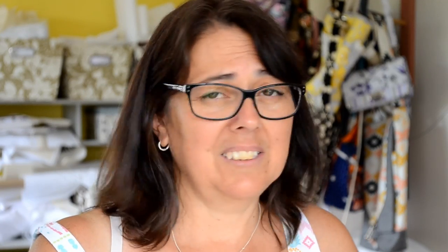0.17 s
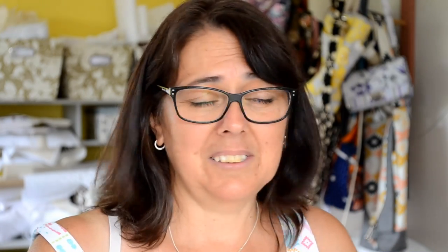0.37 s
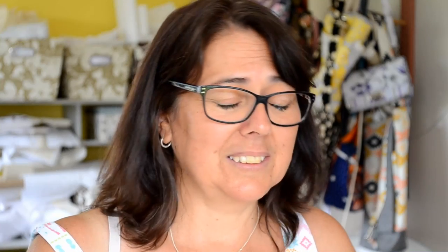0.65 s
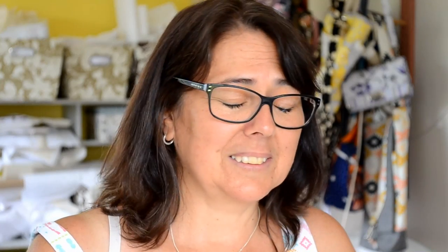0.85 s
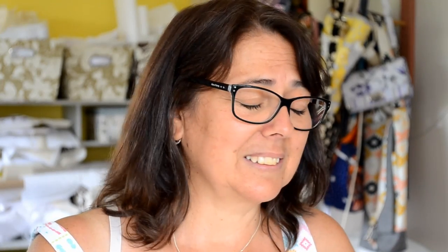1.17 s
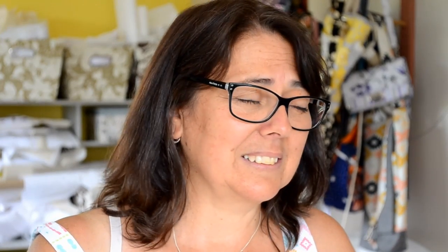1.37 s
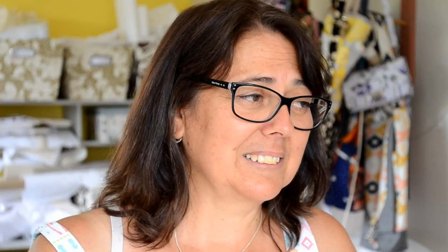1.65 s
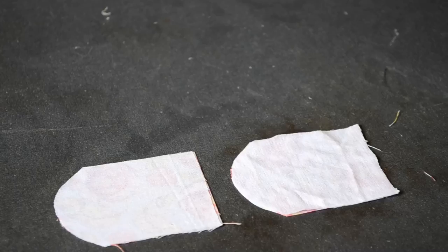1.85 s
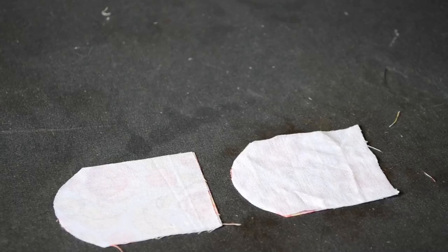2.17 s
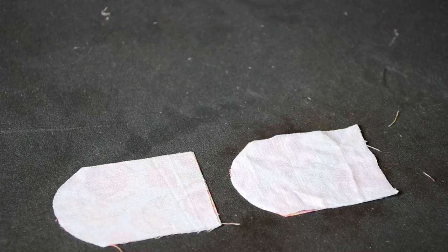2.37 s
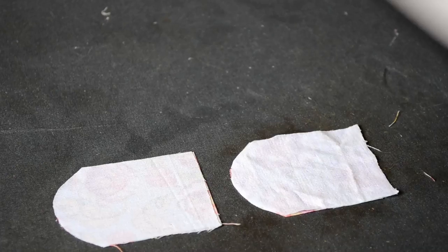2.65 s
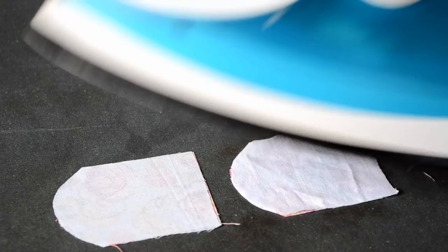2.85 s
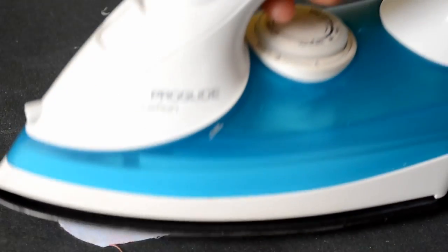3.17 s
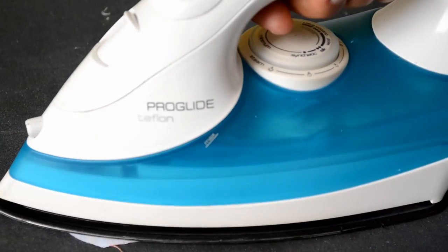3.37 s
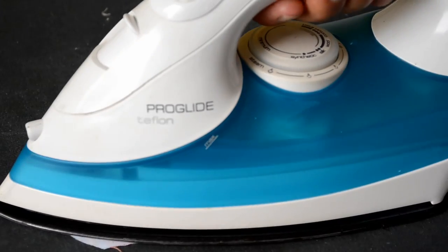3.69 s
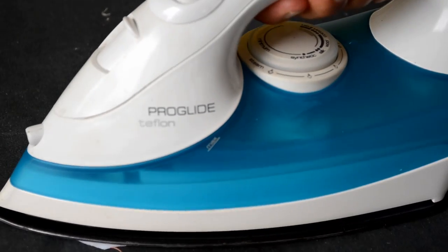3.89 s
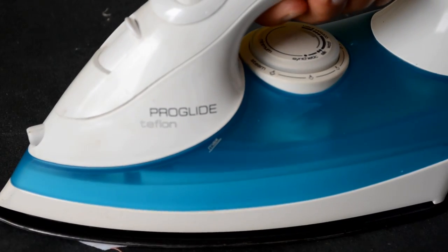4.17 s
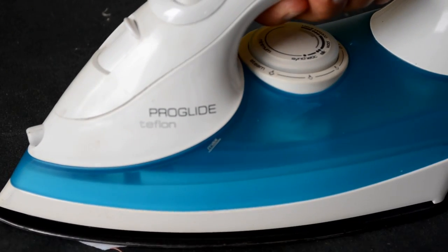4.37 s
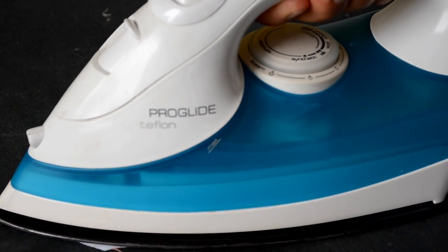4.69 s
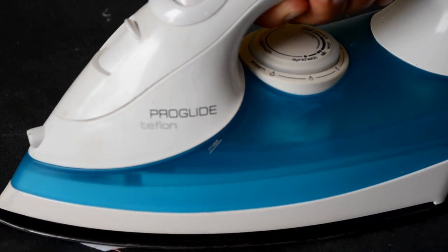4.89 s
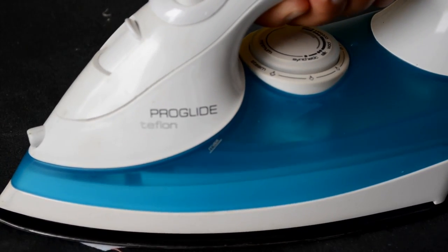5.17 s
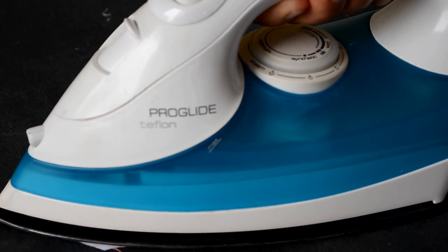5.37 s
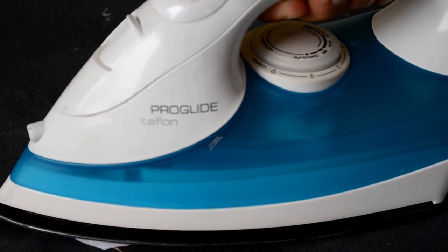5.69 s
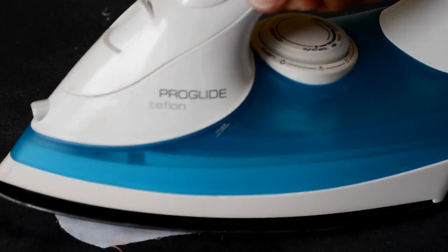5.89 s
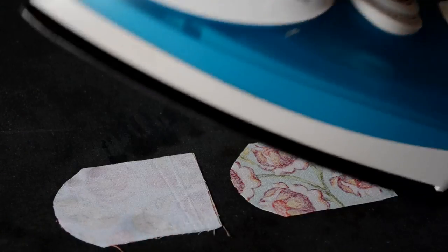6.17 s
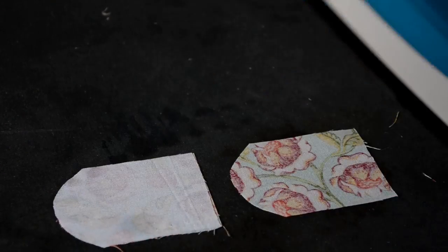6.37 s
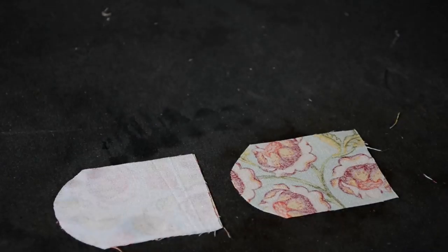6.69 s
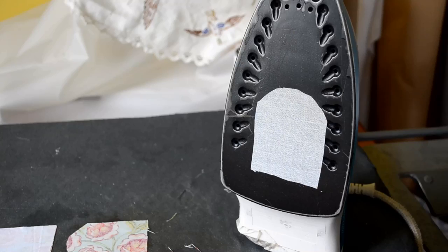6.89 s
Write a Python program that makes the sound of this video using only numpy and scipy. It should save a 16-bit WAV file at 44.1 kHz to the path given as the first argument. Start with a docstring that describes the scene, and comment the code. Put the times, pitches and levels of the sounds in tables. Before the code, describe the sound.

Close stereo microphone, dry small room with soft low air noise. First a loud plastic clack, a rising scrape and a bright snap that rattles away. After a brief near-silence come tiny dull ticks and a fabric rustle. A muted padded thump, light shell knocks and creaks lead into four short roaring steam puffs with weaker sputtering between. A short slide, quiet, then a firm tap as the iron is stood up.

```python
"""A quiet sewing room, heard close, in stereo: a hollow plastic clack, a scrape, a snap that rattles out.
The room noise dips briefly and swells back; then come faint dull ticks and a fabric swish.
A steam iron lands on cloth on a padded board: board and shell ring as decaying modes, the handle creaks.
Shaped noise gives four strong hissing puffs and two faint ones, amid glugs, whistles and spitting drops.
The iron slides off the cloth, leaks a little steam as it is lifted away, and is stood on its heel."""
import sys
import numpy as np
from scipy import signal
from scipy.fft import rfft, irfft
from scipy.io import wavfile
from scipy.ndimage import uniform_filter1d

SR = 44100
rng = np.random.default_rng(int(sys.argv[2]) if len(sys.argv) > 2 else 0)


def pcm_store(signal):
    """Save signal as 16-bit PCM."""
    levels = np.round(np.clip(np.atleast_2d(signal), -1, 1) * 32767)
    wavfile.write(sys.argv[1], SR, levels.astype(np.int16).T)


N = 310460
TIME = np.arange(N) / SR
BINS = np.maximum(np.arange(N // 2 + 1) * SR / N, 1)   # Hz; no zero, so that its logarithm exists
SIDES = np.array([[1], [-1]])   # left, right
CUTOFF_HZ = 14500

# Room noise outline: freq_hz, density_db_per_hz
AIR = [(15, -15), (25, -10.5), (65, 5), (97, 4), (134, -1.5), (267, -3), (408, -3.5), (492, -3), (1250, -5),
       (2770, -17), (3250, -15), (3910, -15.5), (5240, -25.5), (12000, -32.5), (14400, -42.5)]
# Dips and resonances in the room noise: freq_hz, width_hz, lift_db
AIR_PEAKS = [(60.4, 130, -7), (1010, 310, 3), (1804, 690, 6), (2760, 670, 7.5)]
# Level of the room noise after the dip; before it the noise is a little weaker and thinner in the bass
AIR_DB, AIR_EARLY_DB, AIR_EARLY_CUT_HZ = -59.6, -.7, 90
# The room noise drops out briefly and swells back
DIP_START_S, DIP_FALL_S, DIP_HOLD_S, DIP_RISE_S, DIP_DB = 1.863, 0.01, .075, 0.39, -38
# Faint soft tones around the handling: start_s, length_s, pitch_hz, level_db
LOW_TONES = [(1.083, .07, 280, -58), (1.292, .13, 334, -57), (2.0135, .01, 1150, -63)]

# In all blow tables crack_db is the level of the bright crack's noise before its filters.
# Hollow clack before the scrape, its small rebound, and one more near the snap: start_s, peak_db, crack_db
CLACKS = [(1.1533, -13, -31.5), (1.168, -28.5, -52), (1.2488, -19.5, -53.5)]
# Modes of the hollow part: pitch_hz, relative_level_db, t60_s
HOLLOW = [(290, -7, 0.009), (730, -6.5, 0.021), (984, 2, 0.031), (1187, 3.5, 0.036), (1490, -9.5, 0.047),
          (1920, -4, 0.024), (2186, -10.5, 0.029), (2730, -8, .022), (2930, -10, 0.057), (3330, -7, 0.018),
          (4280, -16.5, 0.022)]
# Sharp snaps of a catch: start_s, peak_db, crack_db
SNAPS = [(1.2495, -24.5, -58.5), (1.2785, -22, -34.5), (1.2922, -8, -31.5), (1.3222, -33.5, -53),
         (1.3292, -39, -60), (1.3325, -24.5, -49), (1.3595, -34, -53), (1.3622, -36, -60)]
# Modes of the catch: pitch_hz, relative_level_db, t60_s
CATCH = [(385, -21, 0.0413), (920, -14.5, 0.071), (1200, -16, 0.02), (1920, -9.5, 0.022),
         (2450, -13.5, 0.013), (2726, -2.5, 0.02), (3224, 5.5, 0.0097), (3870, 5.5, 0.0045),
         (4340, -2.5, 0.0045), (4600, -6.5, 0.005), (6120, -17, 0.0028), (8370, -27, 0.0045)]
# Faint dull ticks: start_s, peak_db, crack_db
TICKS = [(1.9335, -55, -83), (1.9953, -44, -51), (2.3175, -46, -76), (2.3873, -40, -55),
         (2.3985, -38.5, -55), (2.4708, -45.5, -64), (6.8727, -37.5, -75)]
# Modes of the ticks: pitch_hz, relative_level_db, t60_s
TICK_RING = [(260, -15, 0.017), (480, -11, 0.014), (830, -6, 0.0076), (1020, -1.5, 0.026),
             (1216, -3, 0.037), (1500, -10, 0.012), (1870, 1, 0.017), (2720, -3, 0.0067)]

# Strokes of a scrape that builds up to the snap: start_s, length_s, level_db
SCRAPES = [(1.16, 0.043, -48.5), (1.198, 0.046, -44.5), (1.222, 0.08, -34.5), (1.238, 0.007, -44)]
# Scrape outline: freq_hz, relative_level_db
SCRAPE_COLOUR = [(200, -24), (650, -19), (1000, 2), (1600, -12), (3000, -14), (3800, -22), (4600, -20.5),
                 (5200, -28.5), (6000, -28.5), (9000, -33), (13000, -48.5)]
# Resonances of the scraped part: freq_hz, width_hz, lift_db
SCRAPE_PEAKS = [(890, 60, 9.5), (1130, 110, 4.5), (2060, 170, 10.5), (2380, 160, -6), (2750, 200, 4.5),
                (3130, 330, 15.5), (4500, 260, 7)]
# Short rasps of loose plastic: start_s, length_s, level_db
RASPS = [(1.315, 0.0083, -34), (1.328, 0.025, -43), (1.358, 0.018, -46), (1.38, 0.017, -46.5),
         (1.409, 0.016, -51.5)]
# Rasp outline: freq_hz, relative_level_db
RASP_COLOUR = [(300, -16.5), (1100, 1.5), (1550, -4.5), (2100, 0), (2900, -2), (3800, -12), (5000, -16.5),
               (6500, -25.5), (10500, -32), (13000, -44.5)]
# Fabric swishes: start_s, length_s, level_db
SWISHES = [(2.33, 0.078, -47), (2.362, 0.0037, -48), (2.369, 0.0085, -40), (2.386, 0.03, -50)]
# Swish outline: freq_hz, relative_level_db
SWISH_COLOUR = [(300, -35), (950, -2.5), (1550, -7), (2000, 1.5), (2700, 5), (3400, 2.5), (4300, -6.5),
                (5500, -17.5), (10000, -25.5), (13000, -42)]
# Cloth slaps and rustles as the iron lands on it: start_s, length_s, level_db
RUSTLES = [(3.302, 0.053, -48), (3.315, 0.0094, -43), (3.353, 0.041, -56.5)]
# Cloth outline: freq_hz, relative_level_db
CLOTH_COLOUR = [(150, 6.5), (450, -4), (850, 6), (1600, 0.5), (2300, -3.5), (2900, 0), (4500, -16.5),
                (7000, -17.5), (10000, -12.5), (13000, -36)]
# The soleplate slides off the cloth
SLIDE_START_S, SLIDE_ATTACK_S, SLIDE_HOLD_S, SLIDE_FALL_DB_PER_S, SLIDE_DB = 5.823, .012, .035, 200, -50
# Slide outline: freq_hz, relative_level_db
SLIDE_COLOUR = [(59, -43), (100, -9), (266, -14), (518, -4.5), (755, -13.5), (1630, -10.5), (2000, -16.5),
                (6000, -42), (7800, -73), (13200, -120)]

# The iron lands on the padding and settles: start_s, peak_db, crack_db
LANDING = [(3.3105, -36, -66), (3.328, -38, -78.5), (3.368, -58, -85), (3.384, -46.5, -79),
           (3.422, -52.5, -88.5), (3.45, -51.5, -88)]
# Modes of the board: pitch_hz, relative_level_db, t60_s
BOARD = [(57.5, -11, 0.15), (76, 0, 0.12), (119, 9.5, 0.071), (152.5, 1, 0.072), (208, -23, 0.055),
         (268, -5.5, 0.14)]
# Knocks on the iron's plastic shell: start_s, peak_db, crack_db
KNOCKS = [(3.612, -47.5, -62), (3.727, -41, -73), (3.832, -27, -52), (3.859, -44, -50), (3.875, -39, -50),
          (3.896, -30, -54), (4.116, -37, -58), (4.175, -35, -58), (4.322, -39, -54), (4.738, -35, -56),
          (4.762, -31, -52), (5.03, -34, -58), (5.111, -39, -66), (5.3885, -30, -50), (5.700, -35, -68),
          (5.831, -40, -66), (5.9975, -41, -72), (6.661, -45.5, -54)]
# Modes of the shell: pitch_hz, relative_level_db, t60_s
SHELL = [(199, -22, 0.06), (313, -8.5, 0.055), (713, -11, 0.023), (895, -6.5, 0.097), (1216, 4.5, 0.021),
         (1454, -3.5, 0.039), (1940, 1.5, 0.017), (2480, -5, 0.0089), (3000, -18, 0.0091),
         (4500, -21, 0.008)]
# The iron is stood on its heel: start_s, peak_db, crack_db
HEEL_TAPS = [(6.907, -20.5, -32)]
# Modes of the heel: pitch_hz, relative_level_db, t60_s
HEEL = [(130, -14, 0.07), (270, -1, 0.026), (700, -6, 0.033), (900, -5, 0.035), (1090, 0, 0.028),
        (1170, -3, .024), (1750, -2, 0.014), (1950, 3, 0.018), (2450, -4, 0.018), (3270, -4, 0.014),
        (3850, -6, .01), (4250, 0, 0.01), (5750, -7, .008)]
# Creaks of the handle: start_s, length_s, slip_rate_hz, level_db
CREAKS = [(3.788, 0.016, 880, -54.5), (4.114, 0.0069, 790, -46), (4.167, 0.025, 880, -45.5),
          (4.275, 0.019, 860, -51), (4.532, 0.024, 860, -51), (4.597, 0.016, 900, -48.5),
          (4.762, 0.017, 900, -38), (5.692, 0.029, 890, -47)]

# Big bubbles glug as water meets the hot plate: start_s, peak_db, crack_db
GLUGS = [(3.865, -43, -70), (3.877, -38, -60), (3.897, -35, -60), (4.299, -45, -70), (4.372, -36, -62),
         (4.554, -43, -70), (4.776, -42, -70), (4.835, -35, -56), (4.844, -37, -62), (4.869, -30, -60),
         (5.043, -43, -70), (5.389, -34, -62)]
# Modes of the water chamber: pitch_hz, relative_level_db, t60_s
CAVITY = [(153, 0, 0.011), (239, 8.5, 0.072), (380, 2, 0.29), (515, -2.5, 0.059), (1035, 6, 0.032)]
# Droplets spit on the plate, louder as the flow grows; each rings down by 60 dB in so many cycles
SPITS_PER_S, SPIT_LOW_HZ, SPIT_HIGH_HZ, SPIT_CYCLES = 170, 840, 1600, 16
SPIT_DB, SPIT_POWER = -41, .58   # level at full flow, power of the flow
# A low whump as each dose of water meets the hot plate: start_s, length_s, level_db
WHUMPS = [(3.845, 0.077, -48.5), (4.366, 0.054, -43), (4.828, 0.05, -42.5), (5.385, 0.019, -44.5)]
# Whump outline: freq_hz, relative_level_db
WHUMP_COLOUR = [(40, -12), (120, -12), (250, 0.5), (360, -19), (550, -10), (900, -11)]

# A dose of water flashes to steam: start_s, attack_s, hold_s, level_db, fall_db_per_s
PUFFS = [(3.889, 0.069, 0.033, -25.5, 202), (4.019, 0.025, 0.012, -38.5, 257),
         (4.371, 0.068, 0.0038, -25.5, 184), (4.464, 0.02, 0.011, -44, 260),
         (4.843, 0.046, 0.006, -23.5, 163), (5.391, 0.034, 0.023, -24, 138)]
# The plate simmers before and after each puff: start_s, hold_s, roar_db, hiss_db
SIMMERS = [(3.784, 0.12, -50.5, -61), (4.108, 0.014, -64, -57.5), (4.265, 0.099, -50, -60),
           (4.537, 0.023, -47.5, -58.5), (4.692, 0.21, -53, -64), (4.728, 0.025, -49, -60),
           (5.067, 0.005, -51.5, -61), (5.218, 0.08, -57.5, -62), (5.27, 0.15, -55.5, -66),
           (5.616, 0.11, -54, -66)]
SIMMER_ATTACK_S, SIMMER_FALL_DB_PER_S = 0.024, 270
# A faint wash of steam lies under all the puffs
WASH_START_S, WASH_ATTACK_S, WASH_HOLD_S, WASH_FALL_DB_PER_S = 3.79, 0.071, 0.6, 13
WASH_ROAR_DB, WASH_HISS_DB = -54.5, -70
# The lifted iron leaks a little: start_s, length_s, level_db
LEAKS = [(5.65, 1.5, -77.5), (6.6, 0.14, -77)]
# Roar of steam escaping under the soleplate: freq_hz, density_db_per_hz
ROAR = [(35, -47), (80, -26), (200, -13.5), (430, -16.5), (600, -6), (800, -2), (1300, -2), (2000, 0),
        (2750, -1.5), (3400, -4), (3900, -11), (4500, -17.5), (7000, -33.5)]
# Resonances of the steam chamber and of the gap under the plate: freq_hz, width_hz, lift_db
CHAMBER = [(244, 55, 5.5), (378, 73, 8.5), (768, 56, 1.5), (920, 25, -3.5), (1140, 50, 7.5), (1305, 42, 4),
           (1510, 22, 5.5), (1646, 34, 6), (1750, 32, 6), (1840, 39, -0.5), (2030, 90, -1.5),
           (2130, 40, 0.5), (2330, 40, 4), (2490, 43, 1.5), (2680, 40, 6.5), (2830, 45, 4.5),
           (3130, 50, -2), (3610, 130, -1.5), (4020, 33, 6.5)]
# Hiss of the steam jets: freq_hz, density_db_per_hz
HISS = [(3000, -6), (4400, 9), (5400, 7), (6400, 4.5), (8100, 5.5), (9200, -1.5), (10300, 4), (12300, 3),
        (13400, -3), (14500, -30)]
# The jets hiss under the roar at full flow and die sooner: hiss grows as flow to this power
HISS_DB, HISS_POWER = -34, 1.32
# Steam spreading sideways: freq_hz, side_minus_mid_db
STEAM_WIDTH = [(80, -9), (250, -12), (700, -18), (1500, -20), (4000, -15), (8000, -12), (14000, -8)]
# Eddies make narrow bands of the steam swell and fade on their own
EDDY_DB, EDDY_WIDTH_HZ, EDDY_S = 2.4, 90, .06
# The flow chokes for a moment late in the second strong puff
CHOKE_S, CHOKE_WIDTH_S, CHOKE_DB = 4.535, .004, -9
# Airy whistles of single steam holes, other ones in each puff: start_s, length_s, pitch_hz, level_db
WHISTLES = [(3.92, 0.14, 1000, -39.5), (3.92, 0.14, 1478, -33.5), (3.918, 0.13, 3356, -37),
            (4.39, 0.12, 1220, -36.5), (4.385, .11, 3250, -38), (4.85, 0.14, 1500, -42),
            (4.85, 0.12, 1615, -38), (4.85, .12, 2330, -37.5), (5.267, 0.045, 1980, -54),
            (5.309, .04, 2130, -49), (5.401, 0.11, 1100, -52), (5.399, 0.11, 1262, -37),
            (5.40, .12, 1620, -49), (5.40, 0.16, 3130, -38), (5.40, 0.079, 4500, -48)]
WHISTLE_WIDTH_HZ = 34


def from_db(db):
    """Decibels to gain."""
    return 10 ** (np.asarray(db) / 20)


def rms_one(x):
    """Scale to unit rms."""
    return x / np.sqrt(np.mean(x ** 2) + 1e-20)


def butter(x, hz, kind, order=2):
    """Causal low- or high-pass."""
    sections = signal.butter(order, np.clip(hz, 10, .45 * SR), kind, fs=SR, output="sos")
    return signal.sosfilt(sections, x)


def response(points, peaks=()):
    """Gain at every frequency: a smooth outline with resonances on top, falling off beyond both ends."""
    hz, db = np.transpose(points)
    outline = np.interp(np.log(BINS), np.log(hz), db)
    lift = sum(lift_db / (1 + (2 * (BINS - centre) / width) ** 2) for centre, width, lift_db in peaks)
    top_fall = 1 / (1 + (BINS / hz[-1] / 2) ** 8)
    bass_fall = BINS / np.hypot(BINS, hz[0] / 2)
    return from_db(outline + lift) * top_fall * bass_fall


def noise(colour, grain_db=0):
    """Dense tiny impulses of uneven size through a colour; rms 1."""
    sizes = from_db(grain_db * np.minimum(rng.exponential(1, N), 6))
    return rms_one(irfft(rfft(rng.standard_normal(N) * sizes) * colour, N))


def drift(rate_hz):
    """Random wander, smoothed above a rate, with spread 1."""
    return rms_one(irfft(rfft(rng.standard_normal(N)) / (1 + (BINS / rate_hz) ** 2), N))


def add(out, start_s, sound):
    """Mix a short sound in at a time."""
    at = int(start_s * SR)
    out[at:at + len(sound)] += sound[:max(N - at, 0)]


def swells(events):
    """Gain over time: one smooth rise and fall for each row."""
    out = np.zeros(N)
    for start_s, length_s, level_db in events:
        t = TIME[:int(length_s * SR)]
        add(out, start_s, from_db(level_db) * np.sin(np.pi * t / length_s))
    return out


def surge(start_s, attack_s, hold_s, fall_db_per_s, ease=1):
    """Gain over time: a rounded rise (eased in when ease is above 1), a hold and an even fall in dB."""
    t = TIME - start_s
    rise = np.sin(np.pi / 2 * np.clip(t / attack_s, 0, 1)) ** ease
    return rise * from_db(-fall_db_per_s * np.clip(t - attack_s - hold_s, 0, 2))


def blows(events, modes, scatter_db, crack_t60, crack_hz):
    """Each blow rings all modes with strengths of its own; hard contacts add a brief bright crack."""
    out, t = np.zeros(N), TIME[:SR // 2]
    hz, level_db, t60 = np.array(modes).T[:, :, None]
    signs = (-1) ** np.arange(len(modes))[:, None]
    for start_s, peak_db, crack_db in events:
        strength = signs * from_db(level_db + scatter_db * rng.standard_normal(hz.shape))
        decay = np.exp(-np.log(1000) * t / t60)
        ring = np.sum(strength * np.sin(2 * np.pi * hz * t) * decay, axis=0)
        crack = rng.standard_normal(len(t)) * np.exp(-np.log(1000) * t / crack_t60)
        crack = butter(butter(crack, 1500, "high"), crack_hz, "low", order=4)
        add(out, start_s, from_db(peak_db) * ring / np.abs(ring).max() + from_db(crack_db) * crack)
    return out


def background():
    """Steady room noise, centred; it drops out once and swells back with more bass."""
    t = TIME - DIP_START_S
    fall = np.clip(t / DIP_FALL_S, 0, 1)
    recovery = np.sin(np.pi / 2 * np.clip((t - DIP_FALL_S - DIP_HOLD_S) / DIP_RISE_S, 0, 1))
    air = noise(response(AIR, AIR_PEAKS))
    early = from_db(AIR_EARLY_DB) * butter(air, AIR_EARLY_CUT_HZ, "high", order=1)
    return from_db(AIR_DB + DIP_DB * (fall - recovery)) * np.where(t < 0, early, air)


def room(x, t60, wall_hz):
    """A short dull tail, different on each side: the room is full of fabric."""
    t = TIME[:SR // 2]
    tail = butter(rng.standard_normal((2, len(t))), wall_hz, "low")
    tail = tail * np.exp(-np.log(1000) * t / t60) * (t > .004)
    return signal.fftconvolve(x[None], tail / np.sqrt(np.sum(tail ** 2) / 2), axes=1)[:, :N]


def low_tones():
    """Soft sine tones that swell and fade."""
    out = np.zeros(N)
    for start_s, length_s, hz, level_db in LOW_TONES:
        t = TIME[:int(length_s * SR)]
        tone = np.sin(2 * np.pi * hz * t) * np.sin(np.pi * t / length_s)
        add(out, start_s, from_db(level_db) * rms_one(tone))
    return out


def dull_ticks():
    """Faint light contacts ring a few short modes."""
    return blows(TICKS, TICK_RING, scatter_db=4.5, crack_t60=0.021, crack_hz=11300)


def plastic_handling():
    """A hollow plastic part clacks, then a stiff catch snaps and rattles out."""
    clacks = blows(CLACKS, HOLLOW, scatter_db=2.0, crack_t60=0.022, crack_hz=6560)
    snaps = blows(SNAPS, CATCH, scatter_db=3.5, crack_t60=0.032, crack_hz=10200)
    return clacks + snaps


def rubbing():
    """Rough surfaces catch and let go many times a second: hard on plastic, soft on cloth."""
    scrape = noise(response(SCRAPE_COLOUR, SCRAPE_PEAKS), grain_db=3.0) * swells(SCRAPES)
    rasps = noise(response(RASP_COLOUR), grain_db=1.0) * swells(RASPS)
    swish = noise(response(SWISH_COLOUR), grain_db=4.0) * swells(SWISHES)
    cloth = noise(response(CLOTH_COLOUR), grain_db=1.5) * swells(RUSTLES)
    sliding = from_db(SLIDE_DB) * surge(SLIDE_START_S, SLIDE_ATTACK_S, SLIDE_HOLD_S, SLIDE_FALL_DB_PER_S)
    slide = noise(response(SLIDE_COLOUR), grain_db=3.0) * sliding
    unevenness = from_db(1.6 * drift(rate_hz=84))
    return unevenness * (scrape + rasps + swish + cloth + slide)


def iron_contacts():
    """The iron's weight thumps the padded board, its shell is knocked, and its heel meets a surface."""
    thump = blows(LANDING, BOARD, scatter_db=5.5, crack_t60=.05, crack_hz=10940)
    knocks = blows(KNOCKS, SHELL, scatter_db=3.0, crack_t60=0.03, crack_hz=10800)
    heel = blows(HEEL_TAPS, HEEL, scatter_db=4.0, crack_t60=0.025, crack_hz=11700)
    return thump + knocks + heel


def handle_creaks(overtone_db, waver):
    """A short run of stick-slip cycles, nearly a pure tone."""
    out = np.zeros(N)
    wobble = 1 + waver * drift(rate_hz=1300)
    for start_s, length_s, slip_hz, level_db in CREAKS:
        size, at = int(length_s * SR), int(start_s * SR)
        phase = 2 * np.pi * np.cumsum(slip_hz * wobble[at:at + size]) / SR
        overtones = np.sin(2 * phase) + np.sin(3 * phase) / 2
        slips = np.sin(phase) + from_db(overtone_db) * overtones
        add(out, start_s, from_db(level_db) * rms_one(slips * signal.windows.tukey(size)))
    return out


def water_glugs():
    """Big bubbles ring the water chamber."""
    return blows(GLUGS, CAVITY, scatter_db=3.5, crack_t60=.015, crack_hz=6000)


def spits(flow):
    """Droplets burst at random, each a short ring with a size of its own and one of twelve pitches."""
    out = np.zeros(N)
    pitches = np.geomspace(SPIT_LOW_HZ, SPIT_HIGH_HZ, num=12)
    sizes = from_db(4.5 * np.minimum(rng.exponential(1, N), 3)) * rng.choice([-1, 1], N)
    bursts = sizes * (rng.random(N) < SPITS_PER_S / SR)
    dealt = rng.integers(0, len(pitches), N)
    for k, hz in enumerate(pitches):
        r = np.exp(-np.log(1000) * hz / SPIT_CYCLES / SR)
        w = 2 * np.pi * hz / SR
        hits = bursts * (dealt == k) + 1e-18   # the tiny offset keeps the filter fast in silence
        out += signal.lfilter([0, np.sin(w)], [1, -2 * r * np.cos(w), r * r], hits)
    boil_hold_s = SLIDE_START_S - WASH_START_S - 2 * WASH_ATTACK_S
    boiling = surge(WASH_START_S, WASH_ATTACK_S, boil_hold_s, SIMMER_FALL_DB_PER_S)
    return from_db(SPIT_DB) * flow ** SPIT_POWER * boiling * rms_one(out)


def whistles():
    """Turbulence rings a narrow resonance, which swells and fades."""
    out = np.zeros(N)
    r = np.exp(-np.pi * WHISTLE_WIDTH_HZ / SR)
    for start_s, length_s, hz, level_db in WHISTLES:
        t = TIME[:int(length_s * SR)]
        resonance = [1, -2 * r * np.cos(2 * np.pi * hz / SR), r * r]
        ring = signal.lfilter([1, 0, -1], resonance, rng.standard_normal(SR // 2))
        settled = rms_one(ring[-len(t):])
        add(out, start_s, from_db(level_db) * settled * np.sin(np.pi * t / length_s))
    return out


def eddies(x, size=1024):
    """Give every narrow band a slowly wandering gain; rms 1."""
    overlap = size * 3 // 4
    hz, times, bands = signal.stft(x, SR, nperseg=size, noverlap=overlap)
    wander = uniform_filter1d(rng.standard_normal(bands.shape), round(EDDY_WIDTH_HZ / hz[1]), axis=0)
    wander = rms_one(uniform_filter1d(wander, round(EDDY_S / times[1]), axis=1))
    gain = from_db(EDDY_DB * np.minimum(wander, 2))
    return rms_one(signal.istft(bands * gain, SR, nperseg=size, noverlap=overlap)[1][:N])


def jet(colour, billow):
    """Turbulent noise that gets wider as the steam billows out on both sides of the plate."""
    side = irfft(rfft(noise(colour)) * response(STEAM_WIDTH), N)
    return eddies(noise(colour)) + SIDES * billow * side


def steam_flow():
    """Gains of the roar and of the hiss: puffs, simmering between them, a faint wash and late leaks."""
    puffs = np.zeros(N)
    for start_s, attack_s, hold_s, level_db, fall_db_per_s in PUFFS:
        puffs += from_db(level_db) * surge(start_s, attack_s, hold_s, fall_db_per_s, ease=1.2)
    jets = from_db(HISS_DB) * (puffs / puffs.max()) ** HISS_POWER
    wash = surge(WASH_START_S, WASH_ATTACK_S, WASH_HOLD_S, WASH_FALL_DB_PER_S)
    roar_gain = np.hypot(puffs, from_db(WASH_ROAR_DB) * wash)
    hiss_gain = np.hypot(jets + swells(LEAKS), from_db(WASH_HISS_DB) * wash)
    for start_s, hold_s, roar_db, hiss_db in SIMMERS:
        simmer = surge(start_s, SIMMER_ATTACK_S, hold_s, SIMMER_FALL_DB_PER_S)
        roar_gain = np.hypot(roar_gain, from_db(roar_db) * simmer)
        hiss_gain = np.hypot(hiss_gain, from_db(hiss_db) * simmer)
    return roar_gain, hiss_gain


def steam():
    """Water flashes to steam with a whump; the chamber roars, holes hiss and whistle, droplets spit."""
    roar_gain, hiss_gain = steam_flow()
    flow = roar_gain / roar_gain.max()
    billow = np.minimum(2 * flow, 1)
    roar = jet(response(ROAR, CHAMBER), billow) * roar_gain
    hiss = jet(response(HISS), billow) * hiss_gain
    whump = noise(response(WHUMP_COLOUR)) * swells(WHUMPS)
    sputter_db = (2.3 - 2.0 * billow) * drift(rate_hz=21)   # a weak flow boils more unevenly
    boiling = from_db(sputter_db) * (roar + whump) + from_db(sputter_db / 2) * hiss
    lean = from_db(-.35 * SIDES * billow)   # the cloud leaves slightly to the right
    choke = from_db(CHOKE_DB * np.exp(-((TIME - CHOKE_S) / CHOKE_WIDTH_S) ** 2))
    return lean * choke * (boiling + whistles() + spits(flow))


def scene():
    """Background, contacts with a little room, rubbing, glugs and steam."""
    contacts = low_tones() + dull_ticks() + plastic_handling() + iron_contacts()
    contacts = contacts + handle_creaks(overtone_db=-38, waver=0.086)
    tail = from_db(-29.0) * room(contacts, t60=0.087, wall_hz=5000)
    return background() + contacts + tail + rubbing() + water_glugs() + steam()


def record(dry):
    """The top is cut steeply by an elliptic low-pass."""
    return signal.sosfilt(signal.ellip(12, .1, 80, CUTOFF_HZ, fs=SR, output="sos"), dry)


dry = scene()
out = record(dry)
pcm_store(out)
```